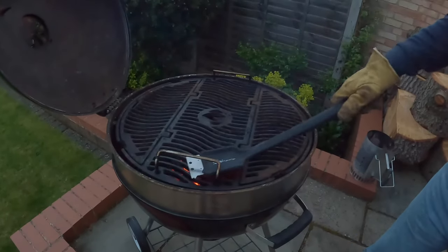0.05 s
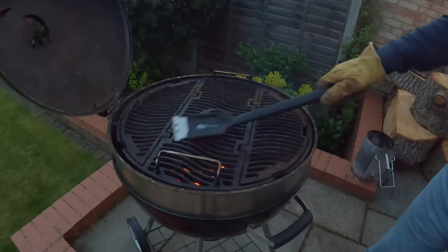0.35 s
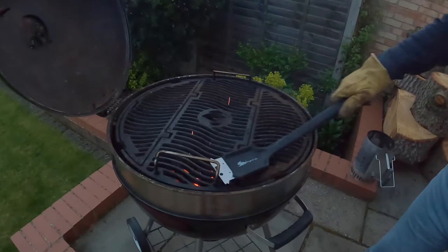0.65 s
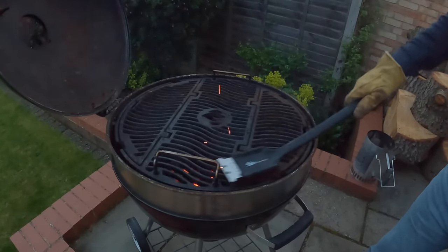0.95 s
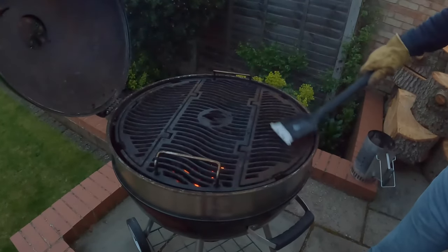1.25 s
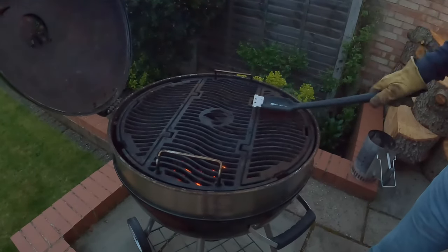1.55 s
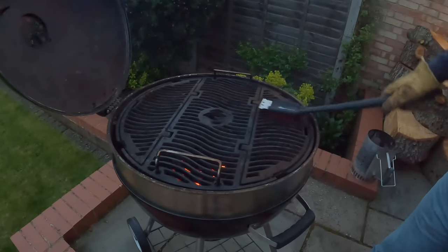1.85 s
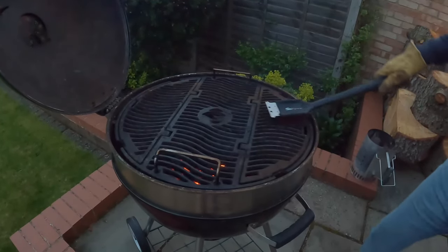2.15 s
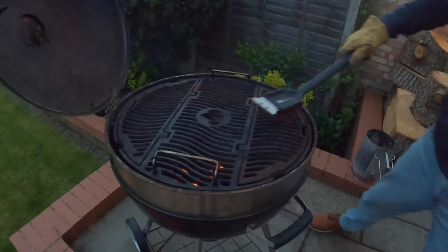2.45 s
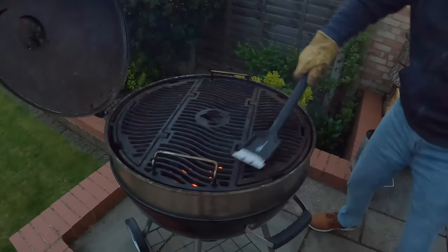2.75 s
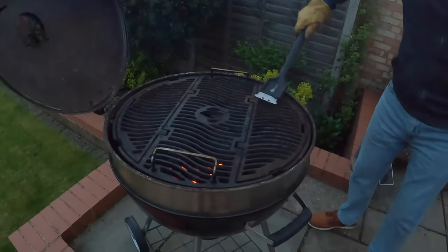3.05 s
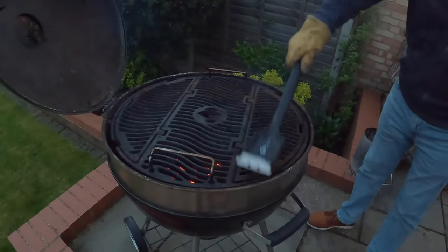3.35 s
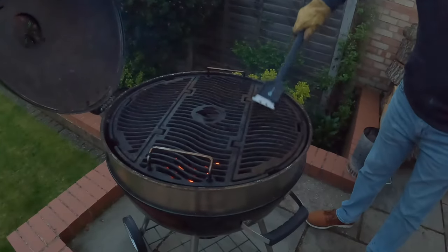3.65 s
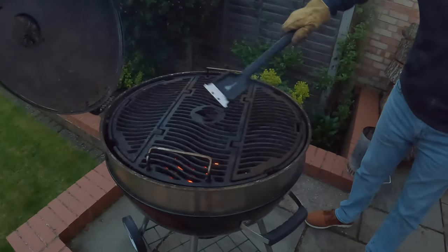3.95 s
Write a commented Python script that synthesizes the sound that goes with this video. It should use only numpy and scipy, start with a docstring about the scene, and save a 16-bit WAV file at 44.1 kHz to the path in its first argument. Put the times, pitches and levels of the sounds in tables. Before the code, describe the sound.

Harsh wire brush scrubbing on an iron barbecue grate, broken by metal knocks and rattles.

```python
"""Scrubbing a kettle grill

A wire brush scrubs a cast iron grate in a small garden, in uneven strokes. By stick-slip friction
the wires flick off the bars and ring the iron while the brush head judders. The scraper blade clanks
on the grate, and hard landings of the brush make the grate rattle in its seat and the bowl boom."""
import sys
import numpy as np
from scipy import signal
from scipy.fft import rfft, irfft
from scipy.io import wavfile

SR = 44100
rng = np.random.default_rng(int(sys.argv[2]) if len(sys.argv) > 2 else 0)


def inscribe(sig):
    """Save sig as 16-bit PCM at rate SR to the path in sys.argv[1].

    A 1-D sig is mono; a 2-D sig holds one channel per row.
    Samples are clipped to [-1, 1] before scaling.
    """
    pcm = np.round(np.clip(np.atleast_2d(sig).T, -1, 1) * 32767)
    wavfile.write(sys.argv[1], SR, pcm.astype(np.int16))


N = 176400

# spectrum of the bristles (frequency [Hz], relative level [dB])
HISS = [(300, -25), (1500, -18), (3000, 0.5), (4500, -1), (6000, -0.5), (7600, 2), (8500, -5.5),
        (11500, -6), (13300, -13.5), (15000, -38)]
# modes of the grate (frequency [Hz], T60 [s], struck at left [dB], struck at front [dB], brushed [dB])
GRATE_MODES = [(608.3, 0.49, -6.5, -9.5, -17), (1057.6, 0.68, -15, -8.5, -4.5), (1306, 0.13, 2.5, -23, 5),
               (1590, .4, -15, -34, -8), (1770, 0.22, -15, -29, 0.5), (1916, 0.14, -6, -31, 2),
               (2010, 0.076, 4, -27, -11), (2163, 0.29, -24, -51, -42), (2225, 0.45, -11, -56, 7),
               (2340, 0.17, -25, 6, 1), (2409, 0.27, -26, -20, 12.5), (2584, 0.61, -21, 2, -22.5),
               (2601, 0.28, -0.5, -1.5, -23), (2700, .2, 9, -8, -14), (2825, 0.46, -12.5, -13, 9.5),
               (2920, 0.12, -31, 10, -1), (3137, 0.25, -37, 9.5, 7), (3600, 0.18, -1.5, 4, -29),
               (3772, 0.53, -16, -21, -7.5), (4350, 0.13, -29, 0, 0), (5440, 0.12, -27, -4, 7),
               (5600, 0.12, -14, -2.5, -9)]


def scrubbing(grate, bowl, bars):
    """Stick-slip friction: wires hiss, grind and set the iron singing while the head judders."""
    # one table a stroke (time [s], hiss [dB], grinding [dB], judder [dB], judder pitch [Hz])
    strokes = [
        [(0.0, -39, -55, -30, 128), (0.01, -61, -40, -24.5, 128.4), (0.044, -48, -76, -32.5, 161),
         (0.048, -55, -35.5, -23, 160), (0.09, -59, -78, -54, 174.5), (0.118, -57, -44, -38.5, 193),
         (0.162, -50, -47, -29.5, 217), (0.256, -43.5, -42, -42, 184), (0.285, -57, -52, -74, 187)],
        [(0.79, -88, -49.5, -40, 192), (0.818, -62, -52, -53, 184), (0.844, -47, -49.5, -26, 184.3),
         (0.886, -45.5, -45.5, -41, 161.7), (0.928, -56, -53, -45.5, 193), (0.954, -66, -59, -63, 181),
         (0.996, -34, -42, -30, 169), (1.036, -43, -52, -54, 170), (1.045, -39, -61, -51, 171)],
        [(1.11, -42, -39.5, -41, 174.9), (1.252, -37, -35.5, -32.5, 180.5), (1.302, -34.5, -33.5, -26.5, 137.3),
         (1.338, -37.5, -33.5, -22, 135.6), (1.368, -35.5, -32.5, -21, 139), (1.406, -37, -35, -23, 174.4),
         (1.458, -57.5, -50.5, -36.5, 173), (1.574, -47, -44, -41, 171.6), (1.62, -61, -54, -45, 176.5)],
        [(1.65, -63, -80, -40, 202), (1.68, -53.5, -49, -52, 200), (1.754, -46, -46, -33.5, 172.6),
         (1.82, -58.5, -53.5, -40.5, 172.9), (1.87, -42.5, -45.5, -30, 168), (1.918, -43, -38.5, -58, 169.6),
         (1.972, -55, -51.5, -44, 166.3), (2.0, -48, -53, -36, 172), (2.04, -76, -51, -47, 174.6)],
        [(2.09, -53.5, -47, -41, 181.6), (2.134, -65, -59.5, -51, 178), (2.166, -54.5, -51.5, -45, 157.2),
         (2.206, -58, -53.5, -42, 173), (2.274, -61, -73, -56, 179.4), (2.346, -64.5, -93, -48, 163.3),
         (2.4, -89, -77, -75, 196), (2.58, -71.5, -58, -63, 129), (2.68, -61, -53, -53, 163.3)],
        [(2.78, -50, -77, -24.5, 133.6), (2.792, -38, -52, -29, 137), (2.83, -33.5, -40.5, -24.5, 167.5),
         (2.862, -29.5, -32.5, -52, 162.7), (2.898, -31, -31.5, -36, 145.9), (2.958, -34, -32, -20.5, 128),
         (3.006, -34.5, -32, -24, 126.3), (3.064, -41, -38, -31.5, 127.3), (3.2, -84, -88, -42, 122.5)],
        [(3.5, -36.5, -40, -10.5, 178), (3.53, -30.5, -38, -27, 189), (3.58, -29.5, -28, -27, 198.7),
         (3.612, -30, -30.5, -40, 195.6), (3.648, -30.5, -31, -38, 165.1), (3.728, -34.5, -33, -29.5, 166),
         (3.738, -35, -39.5, -32, 167), (3.784, -51, -62, -61, 168), (3.83, -85, -65, -58, 155)],
        [(3.9, -84, -59, -57, 168.2), (3.91, -94, -76, -61, 168), (3.924, -76, -51, -67, 166),
         (3.942, -64, -71, -70, 149), (3.958, -62, -58, -76, 146.6), (3.972, -59.5, -61, -67, 149),
         (3.982, -66, -55.5, -34, 150), (4.0, -60, -62, -72, 149)],
    ]
    # spectrum of wire grinding on iron (frequency [Hz], relative level [dB])
    grind_spectrum = [(100, -3.5), (250, -5.5), (360, -6.5), (560, 5), (720, -10), (1250, 0), (2000, 0.5),
                      (2700, -0.5), (4000, -5.5), (7000, -25.5), (14000, -50)]
    hiss, grind, judder = stroke_envelopes(strokes)
    catching = amp(0.95 * walk(rate=90))
    flicks = lambda: unit(clicks(rate=14000, spread_db=1.5, size=N) * catching)
    grit = lambda: unit(clicks(rate=3000, spread_db=2, size=N) * catching)
    wires = hiss * (amp(-1) * colour(flicks(), HISS) + amp(-6) * wire_pings())
    rasp = ringing(amp(-1.5) * grind * colour(grit(), grind_spectrum), bars)
    singing = grate_singing(amp(-7) * grind * grit(), grate)
    shake = amp(-6.5) * judder * head_judder(strokes)
    drone = through(amp(-10) * judder * flicks(), bowl)
    return wires + rasp + singing + shake + drone


def stroke_envelopes(strokes, fade_in_s=0.013, fade_out_s=0.027):
    """Amplitude envelopes of hiss, grinding and judder, with exponential flanks on each stroke."""
    t, envelopes = seconds(N), np.zeros((3, N))
    for stroke in strokes:
        times, *levels, _ = np.array(stroke).T
        before, after = np.maximum(times[0] - t, 0), np.maximum(t - times[-1], 0)
        flanks = np.exp(-before / fade_in_s - after / fade_out_s)
        envelopes = np.maximum(envelopes, [flanks * amp(np.interp(t, times, db)) for db in levels])
    return envelopes


def wire_pings(per_s=700, centre_hz=5173):
    """Free vibration: each wire that slips off a bar twangs briefly at its own pitch."""
    out, t = np.zeros(N), seconds(SR // 10)
    for when, pitch, strength in rng.random((int(per_s * N / SR), 3)):
        octaves = 0.165 * np.log(pitch / (1 - pitch))
        hz = min(centre_hz * 2 ** octaves, SR / 2)
        gain = amp(0.5 * min(-np.log(strength), 4))
        add(out, when * N / SR, gain * np.sin(2 * np.pi * hz * t) * fall(0.12, len(t)))
    return unit(out)


def grate_singing(force, grate, groups=4):
    """Forced resonance: as the brush travels, different groups of modes answer."""
    out, brushed_db = np.zeros(N), np.array(GRATE_MODES)[:, -1]
    for k in range(groups):
        coupling = unit(amp(3.5 * walk(rate=12)))
        out += through(force * coupling, ring(grate[k::groups], brushed_db[k::groups]))
    return out / np.sqrt(groups)


def head_judder(strokes):
    """Narrow-band vibration: the head shakes about a gliding pitch, random in amplitude and phase."""
    times, *_, hz = np.vstack(strokes).T
    phase = 2 * np.pi * np.cumsum(np.interp(seconds(N), times, hz)) / SR
    return unit(walk(rate=30) * np.sin(phase) + walk(rate=30) * np.cos(phase))


def blade_knocks(grate, bowl, bars):
    """Impact excitation: the blade cracks on the grate; where it strikes sets the mix of modes."""
    # (time [s], crack [dB], crack cutoff [Hz], ring [dB], clatter [dB], clatter T60 [s], bowl [dB],
    # place [0 left to 1 front])
    knocks = [(.11, -33, 2200, -48, -24.5, 0.11, -27, 0.55), (0.2934, -16, 5200, -22.5, -27, 0.35, -39, 0),
              (.308, -17, 3600, -27, -26, 0.16, -21, 0.58),
              (0.476, -47, 4000, -86, -42.5, 0.24, -35.5, 0.54),
              (0.6692, -18.5, 11350, -42.5, -29, 0.32, -14, 1),
              (0.68, -20, 6100, -27.5, -25, 0.16, -28, 0.91), (.707, -33, 4000, -32.5, -43, 0.15, -13.5, 1),
              (1.0535, -21.5, 6090, -32, -33.5, 0.15, -24.5, .8),
              (1.412, -44, 3477, -34.5, -66, 0.14, -32.5, 1), (3.1108, -26, 2510, -59, -44, 0.077, -39, 0)]
    # spectra of the contact and of the clatter after it (frequency [Hz], relative level [dB])
    crack_spectrum = [(200, -6), (1200, -10.5), (2300, 10.5), (3600, -3.5), (5300, 1), (8000, -1.5),
                      (12000, -12), (15000, -27)]
    clatter_spectrum = [(100, -17.5), (220, 17.5), (450, 6), (850, -6.5), (1400, 1.5), (2700, -3),
                        (3800, -1), (5500, -16.5), (6800, -28), (9000, -43), (14000, -35)]
    out, clatter = np.zeros(N), np.zeros(N)
    _, _, left_db, front_db, _ = np.array(GRATE_MODES).T
    for at, crack_db, cutoff_hz, ring_db, clatter_db, t60, bowl_db, place in knocks:
        tone = ring(grate, left_db + place * (front_db - left_db))
        envelope = fall(0.036) + amp(5.5) * fall(0.0013)  # a short tail under a sharp spike
        crack = noise(crack_spectrum) * envelope
        crack = signal.sosfilt(signal.butter(4, cutoff_hz, fs=SR, output="sos"), crack)
        add(out, at, amp(crack_db) * crack + amp(ring_db) * tone + amp(bowl_db) * bowl)
        add(clatter, at, amp(clatter_db) * bounces(clatter_spectrum, t60, rise_s=0.00097))
    return out + ringing(clatter, bars)


def brush_landings(bowl, bars):
    """Soft impact: the brush drops on its bristles, the bowl booms and the grate rattles in its seat."""
    # (time [s], bowl [dB], rattle [dB], rattle T60 [s], rattle rise [s], bristle splash [dB])
    landings = [(.001, -30, -27.5, 0.16, 0.0025, -59.5), (.633, -25.5, -35.5, 0.31, 0.0076, -38.5),
                (.69, -39, -29, 0.31, 0.0031, -58), (0.746, -23.5, -28, 0.13, .004, -78),
                (2.706, -12, -6.5, 0.082, 0.0071, -47), (2.73, -10.5, -25, 0.41, 0.003, -65),
                (3.433, -5, -19, 0.26, 0.0061, -45), (3.456, -24, -10, 0.14, 0.0089, -63),
                (3.478, -10, -15.5, .15, .004, -41.5)]
    # spectrum of the grate in its seat (frequency [Hz], relative level [dB])
    rattle_spectrum = [(50, -5), (95, -12), (135, 0), (210, 0), (330, -1.5), (420, -3.5), (560, 0.5),
                       (690, -15), (820, -12.5), (1250, -10), (2000, -23), (3000, -20.5), (4500, -39),
                       (12000, -73)]
    out, rattle = np.zeros(N), np.zeros(N)
    for at, bowl_db, rattle_db, t60, rise_s, splash_db in landings:
        add(out, at, amp(bowl_db) * bowl + amp(splash_db) * noise(HISS) * fall(0.39))
        add(rattle, at, amp(rattle_db) * bounces(rattle_spectrum, t60, rise_s))
    return out + ringing(rattle, bars)


def bounces(spectrum, t60, rise_s):
    """Inelastic collisions: a dying flurry of metal bouncing on metal."""
    impacts = colour(clicks(rate=3000, spread_db=0, size=SR), spectrum)
    return impacts * fall(t60) * (1 - np.exp(-seconds(SR) / rise_s))


def brush_ticks():
    """Short transients: bright wire snaps and two duller taps of the brush landing."""
    # (time [s], level [dB], centre frequency [Hz], T60 [s])
    ticks = [(0.0512, -24, 4630, 0.0074), (0.1999, -33.5, 4230, 0.066), (1, -23, 6000, 0.0087),
             (1.024, -24.5, 5900, 0.0067), (1.037, -35, 6050, 0.0036), (2.0697, -36, 4500, .03),
             (2.3499, -43.5, 7000, 0.011), (2.5313, -51.5, 4000, 0.025), (2.6879, -39, 1630, 0.015),
             (3.165, -46.5, 700, 0.041), (3.738, -27, 5500, 0.031)]
    out = np.zeros(N)
    for at, db, hz, t60 in ticks:
        add(out, at, amp(db) * fall(t60) * noise([(hz / 4, -18), (hz, 0), (hz * 3, -22)]))
    return out


def bowl_response(push_s=0.0065):
    """Inertia: the low modes of the heavy bowl take a moment to swing."""
    # (frequency [Hz], T60 [s], relative level [dB])
    bowl_modes = [(124.6, 0.25, -12), (147.4, 0.39, -9.5), (177.4, 0.15, 2.5), (201.4, 0.16, -0.5),
                  (250.2, 0.19, -7), (409, 0.11, -16.5), (544.8, 0.24, -17), (808, 0.22, -22.5)]
    onset = 1 - np.exp(-(seconds(SR) / push_s) ** 2)
    return ring(modes(bowl_modes), np.array(bowl_modes)[:, 2]) * onset


def bar_response(count=260):
    """Frequency-dependent damping: of the many weak modes of the bars, the high ones die sooner."""
    t, out = seconds(SR // 3), 0
    for pitch, phase, gain in rng.random((count, 3)):
        hz = 650 + 7000 * pitch ** 1.2
        t60 = 0.36 * (2000 / hz) ** 0.2
        out = out + gain * np.sin(2 * np.pi * (hz * t + phase)) * fall(t60, len(t))
    return out


def ringing(contact, bars, coupling=0.75):
    """Structure-borne sound: contact noise radiates partly directly, partly through the bars."""
    return np.sqrt(1 - coupling ** 2) * contact + coupling * through(contact, bars) / 2


def wall_echo(grill, delay_s=0.0075):
    """Reflection: fence and brick wall return a brief, dense echo."""
    walls = rng.standard_normal(SR) * fall(0.1) * (seconds(SR) > delay_s)
    return amp(-20) * through(grill, walls)


def garden_air():
    """Ambient noise: the low, slightly wavering murmur of the open air."""
    # (frequency [Hz], relative level [dB])
    air_spectrum = [(25, -1), (55, -1.5), (100, -6.5), (175, -9), (300, -15.5), (600, -30), (1050, -20),
                    (1500, -28.5), (2300, -40.5), (4000, -39.5), (8000, -46.5), (14000, -63)]
    return amp(-47.5 + 0.55 * walk(rate=5.8)) * noise(air_spectrum, N)


def stereo(mid):
    """Binaural cues: level and phase differences give direction, diffuse sound gives width."""
    # (frequency [Hz], phase lead of the left [rad])
    lead = [(50, 0), (500, -.17), (1000, -.3), (2000, -.52), (3500, -.65), (4900, -.15), (7000, -.05),
            (14000, 0)]
    # (frequency [Hz], left minus right [dB])
    tilt = [(60, -0.17), (110, 0.0), (200, -0.88), (370, -0.79), (680, -0.86), (1250, -1.0), (2300, -1.3),
            (4210, -0.51), (7740, 0.3), (14200, 0.76)]
    # (frequency [Hz], level of the diffuse side signal [dB])
    diffuse = [(30, -17), (100, -21), (500, -12.5), (1000, -26), (4000, -11), (9000, -19), (11000, -17.5),
               (12500, -3.5)]
    side = rfft(through(mid, rng.standard_normal(SR) * fall(0.2))) * amp(across(diffuse, N))
    sign = np.array([[1], [-1]])  # left, right
    direction = amp(sign * across(tilt, N) / 2) * np.exp(1j * sign * across(lead, N) / 2)
    return irfft(rfft(mid) * direction + sign * side, N)


def amp(db):
    """Decibels to amplitude ratio."""
    return 10 ** (np.asarray(db) / 20)


def unit(x):
    """Normalisation to rms 1."""
    return x / np.sqrt(np.mean(x ** 2) + 1e-20)


def across(points, size):
    """Interpolation of (frequency [Hz], value) over log frequency, at every bin of a spectrum."""
    hz, value = np.array(points, float).T
    return np.interp(np.log(np.fft.rfftfreq(size, 1 / SR) + 1), np.log(hz), value)


def colour(x, spectrum):
    """Spectral shaping of a steady sound, at rms 1."""
    return unit(irfft(rfft(x) * amp(across(spectrum, len(x))), len(x)))


def noise(spectrum, size=SR):
    """Coloured Gaussian noise at rms 1."""
    return colour(rng.standard_normal(size), spectrum)


def through(x, response):
    """Convolution with an impulse response scaled to unit energy."""
    return signal.fftconvolve(x, response / np.sqrt(np.sum(response ** 2)))[:len(x)]


def seconds(size):
    """Time axis."""
    return np.arange(size) / SR


def fall(t60, size=SR):
    """Exponential decay, by 60 dB in t60 seconds."""
    return np.exp(-np.log(1000) * seconds(size) / t60)


def add(out, at, x):
    """Superposition of a sound, starting at a time in seconds."""
    start = int(at * SR)
    out[start:start + len(x)] += x[:max(N - start, 0)]


def walk(rate):
    """Random fluctuation at rms 1, gliding to `rate` new values a second."""
    return unit(np.interp(seconds(N) * rate, np.arange(N), rng.standard_normal(N)))


def clicks(rate, spread_db, size):
    """Poisson process: `rate` tiny impacts a second; spread_db makes a few much stronger."""
    impacts = (rng.random(size) < rate / SR) * rng.standard_normal(size)
    return impacts * amp(spread_db * np.minimum(rng.exponential(size=size), 5))


def modes(table):
    """Normal modes: one damped sine per row."""
    return np.array([np.sin(2 * np.pi * hz * seconds(SR)) * fall(t60) for hz, t60, *_ in table])


def ring(waves, db):
    """Modal sum, starting at rms 1."""
    return amp(db) @ waves / np.sqrt(np.sum(amp(db) ** 2) / 2)


def scene():
    """Superposition of the grill, its echo and the garden air, in stereo."""
    grate, bowl, bars = modes(GRATE_MODES), bowl_response(), bar_response()
    grill = scrubbing(grate, bowl, bars) + blade_knocks(grate, bowl, bars)
    grill += brush_landings(bowl, bars) + brush_ticks()
    return stereo(grill + wall_echo(grill) + garden_air())


def record(dry, cutoff_hz=14200):
    """Band limiting: a steep low-pass removes the highest treble."""
    return signal.sosfilt(signal.ellip(8, .2, 70, cutoff_hz, fs=SR, output="sos"), dry)


dry = scene()
out = record(dry)
inscribe(out)
```